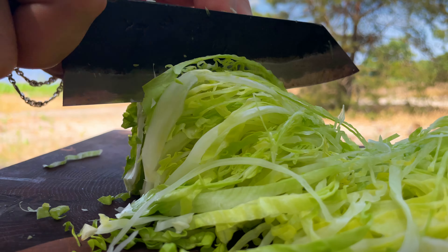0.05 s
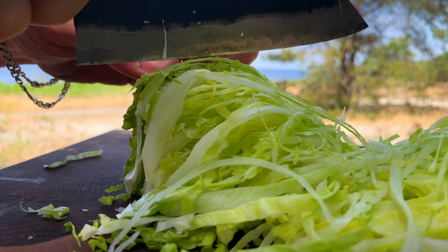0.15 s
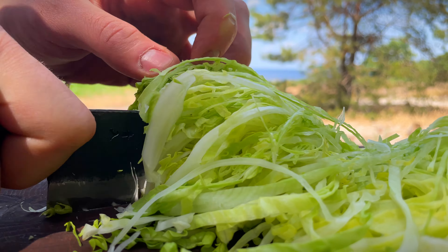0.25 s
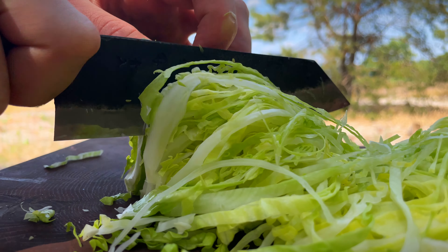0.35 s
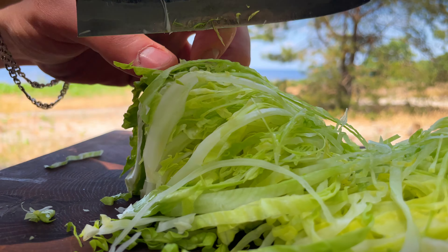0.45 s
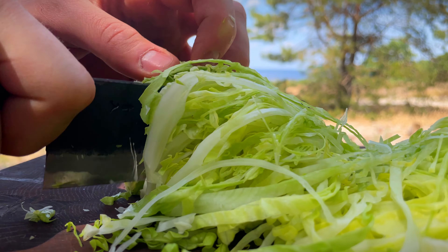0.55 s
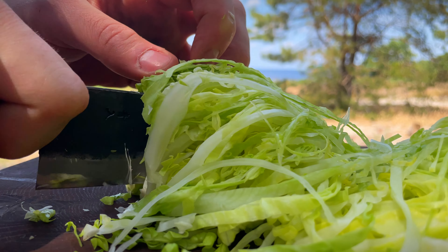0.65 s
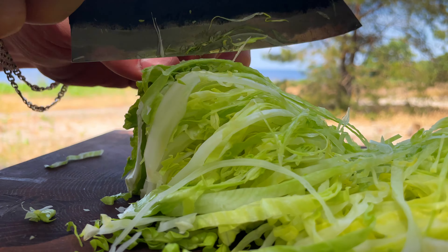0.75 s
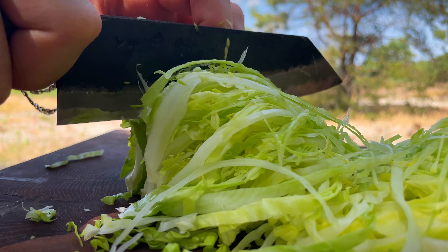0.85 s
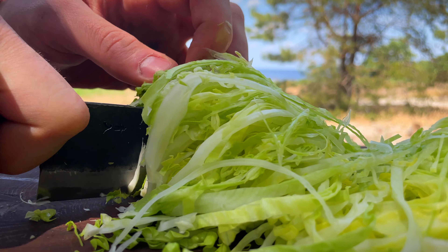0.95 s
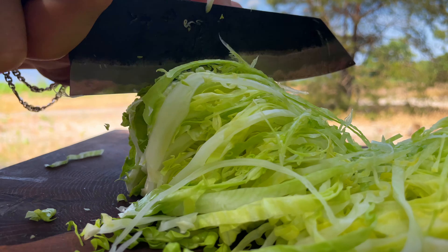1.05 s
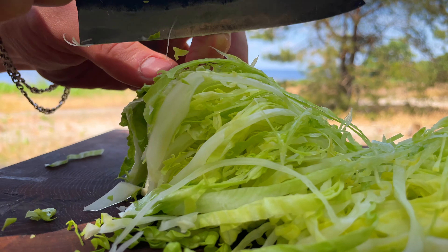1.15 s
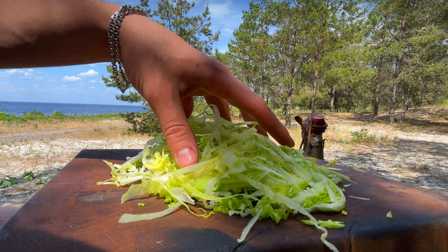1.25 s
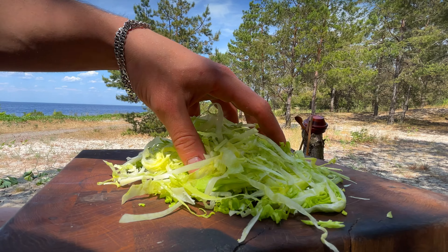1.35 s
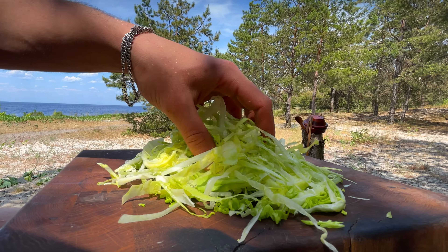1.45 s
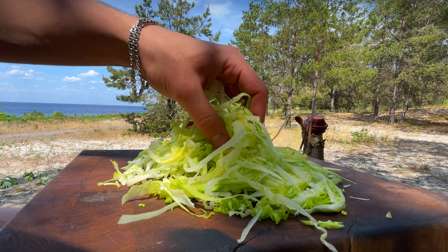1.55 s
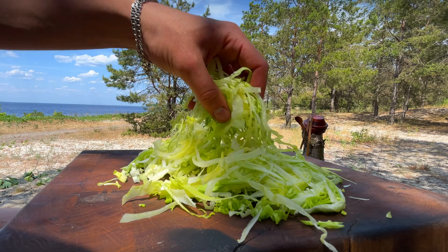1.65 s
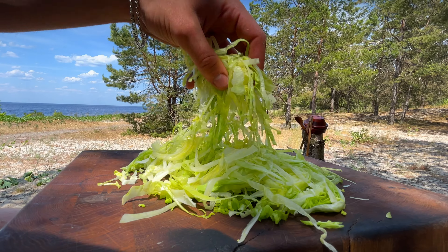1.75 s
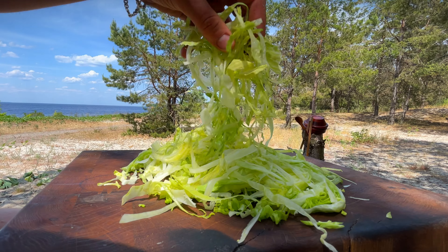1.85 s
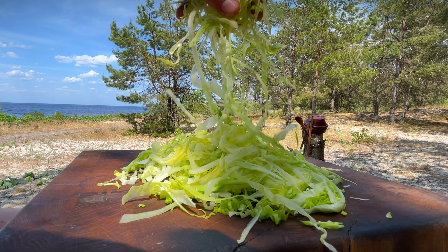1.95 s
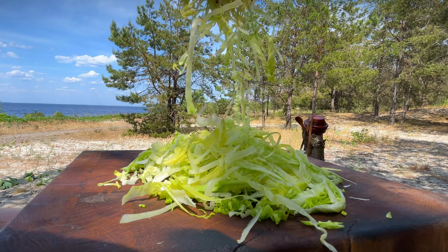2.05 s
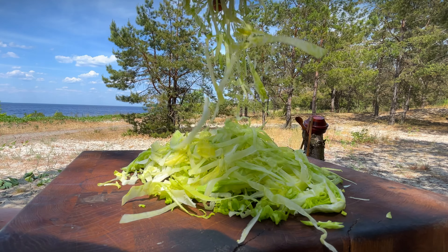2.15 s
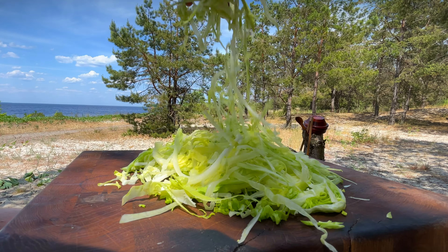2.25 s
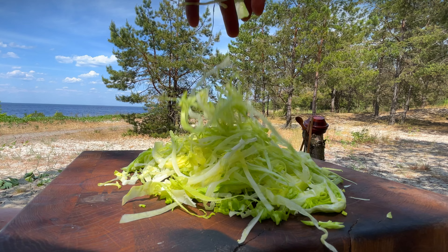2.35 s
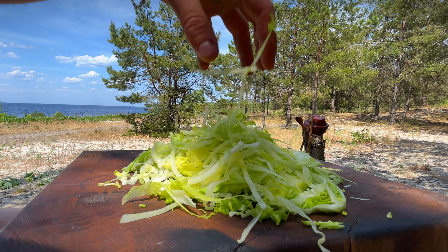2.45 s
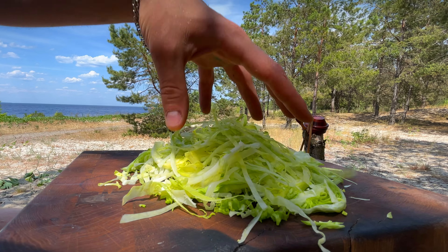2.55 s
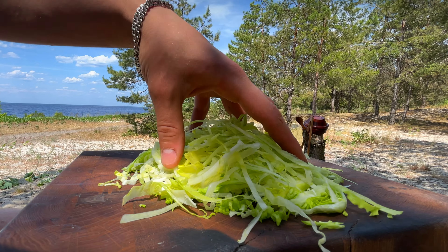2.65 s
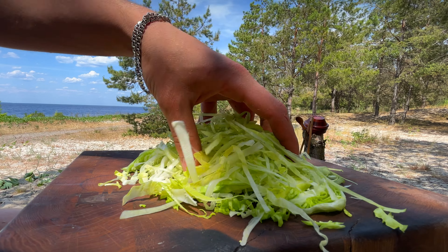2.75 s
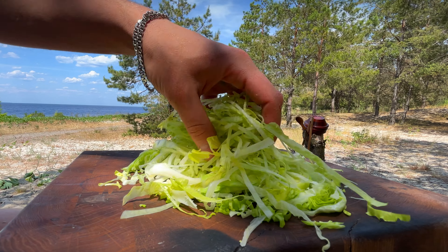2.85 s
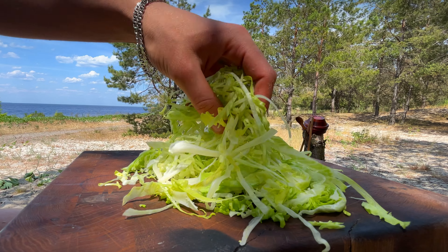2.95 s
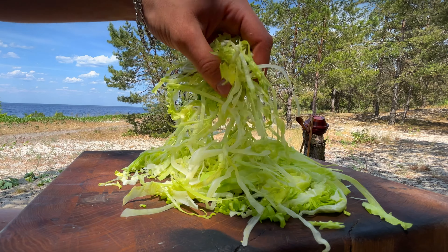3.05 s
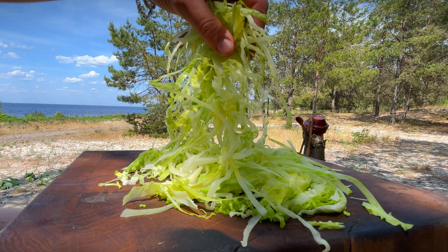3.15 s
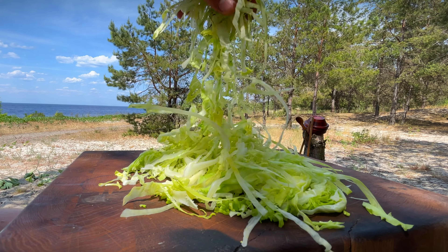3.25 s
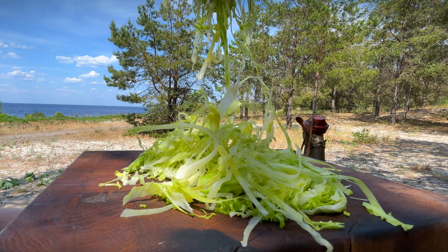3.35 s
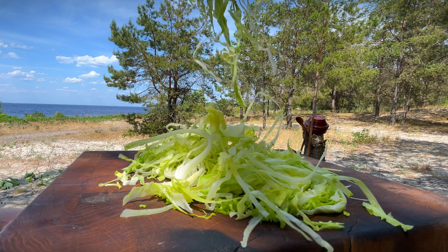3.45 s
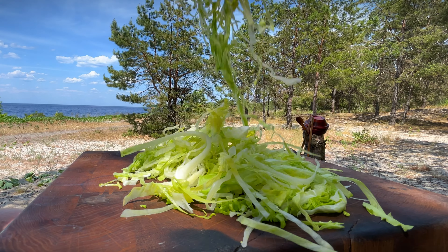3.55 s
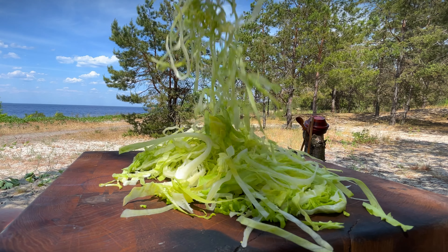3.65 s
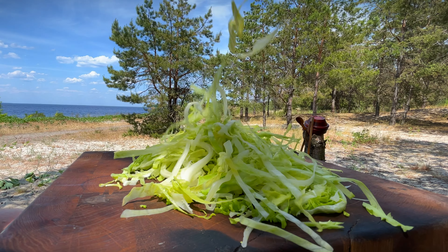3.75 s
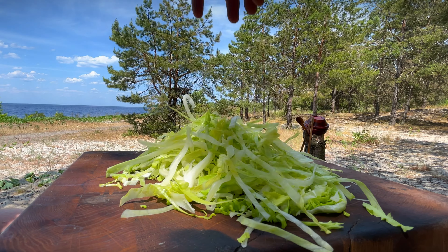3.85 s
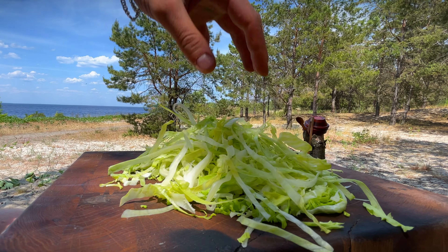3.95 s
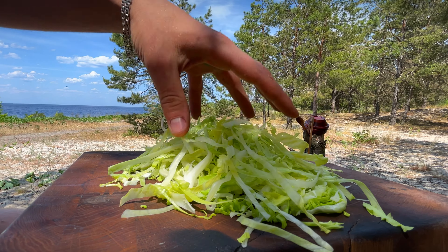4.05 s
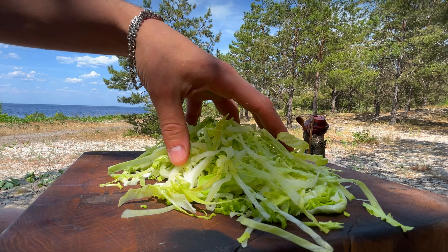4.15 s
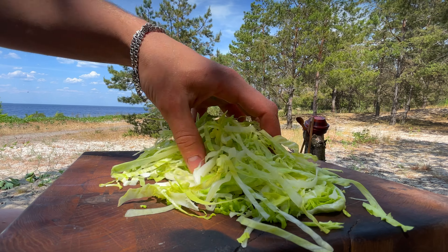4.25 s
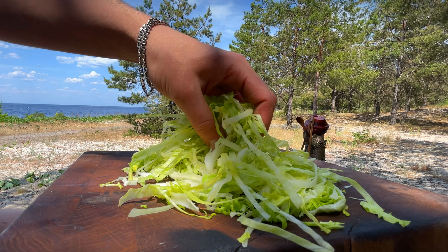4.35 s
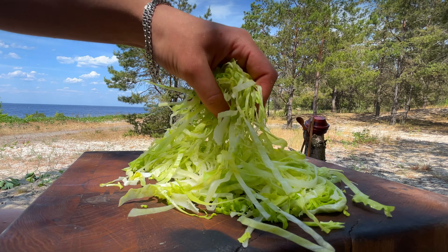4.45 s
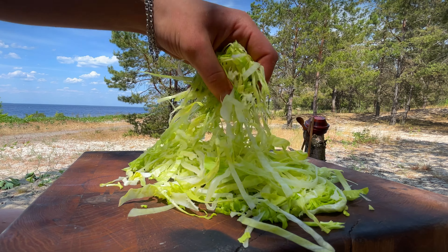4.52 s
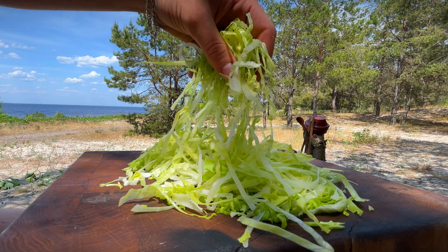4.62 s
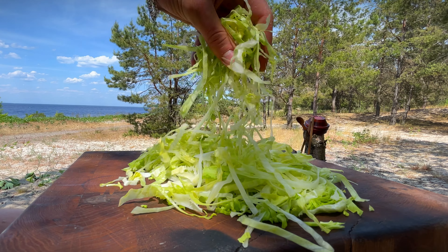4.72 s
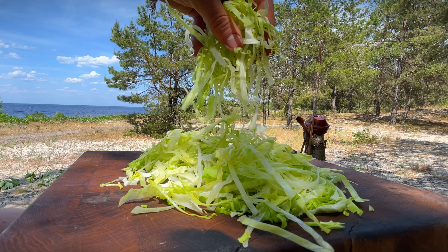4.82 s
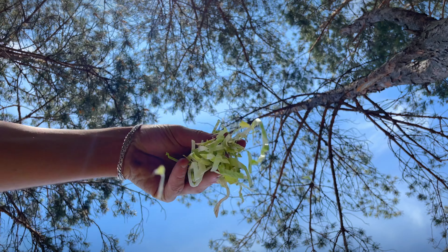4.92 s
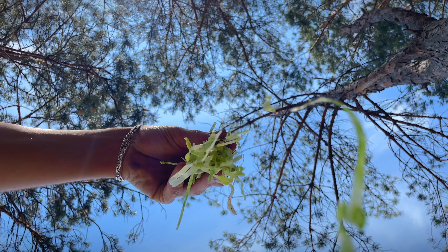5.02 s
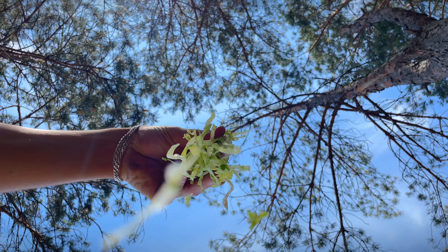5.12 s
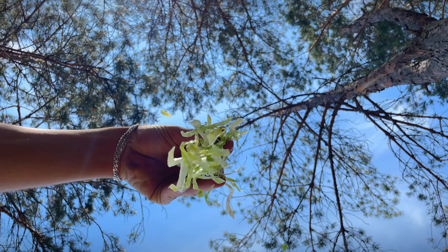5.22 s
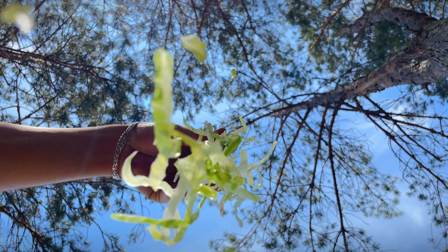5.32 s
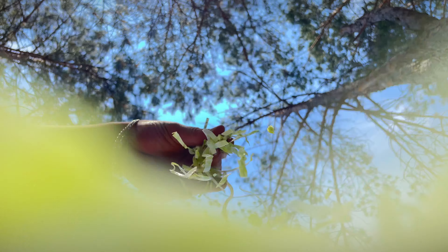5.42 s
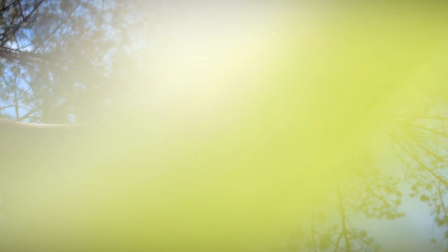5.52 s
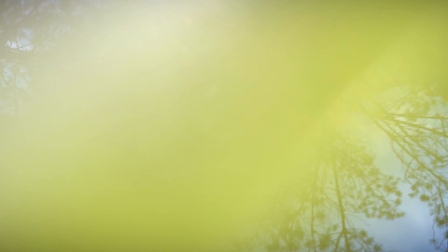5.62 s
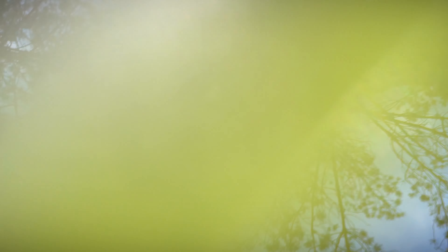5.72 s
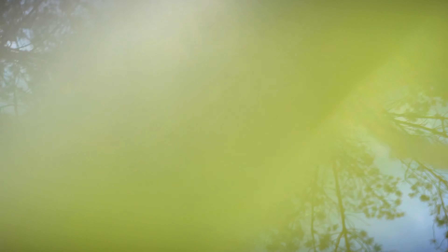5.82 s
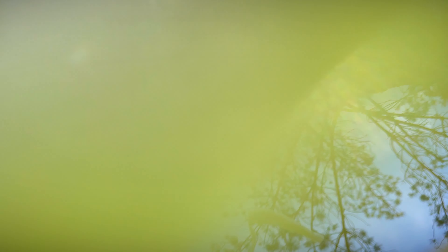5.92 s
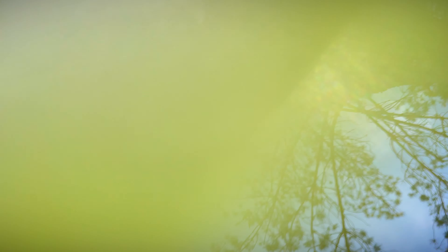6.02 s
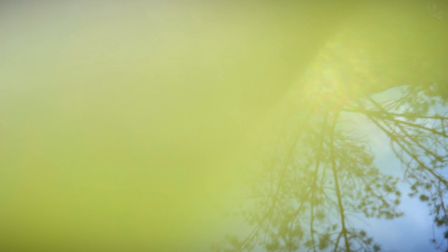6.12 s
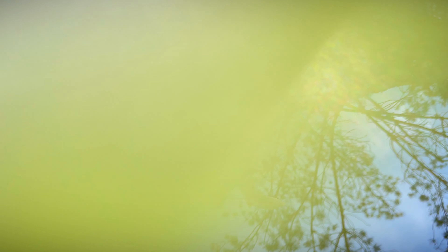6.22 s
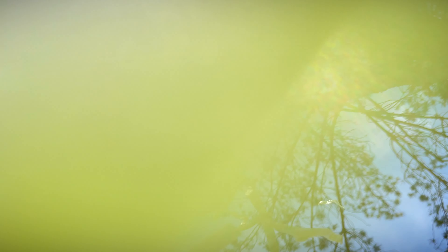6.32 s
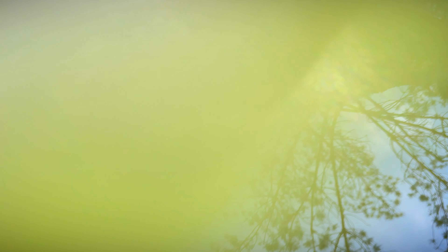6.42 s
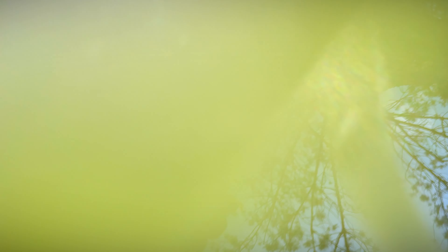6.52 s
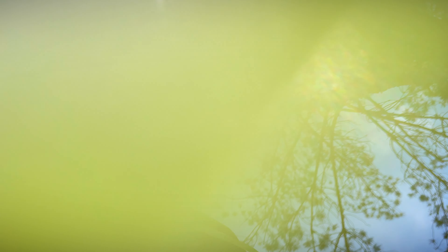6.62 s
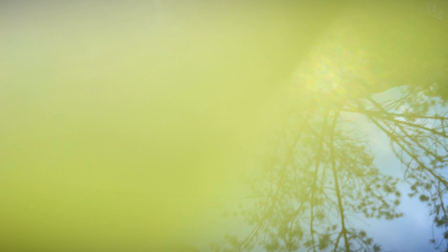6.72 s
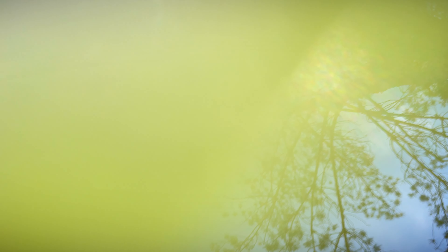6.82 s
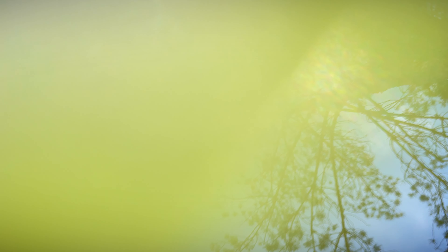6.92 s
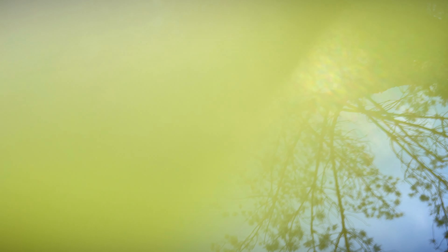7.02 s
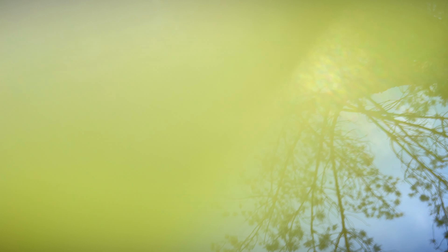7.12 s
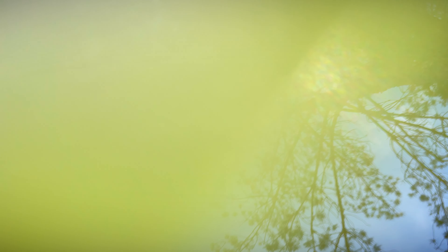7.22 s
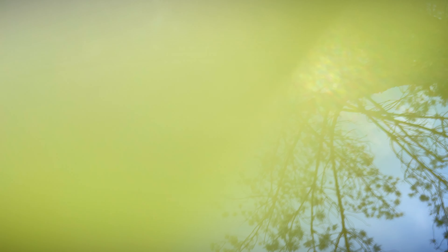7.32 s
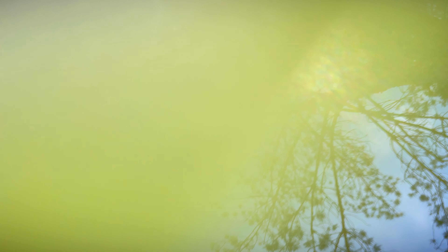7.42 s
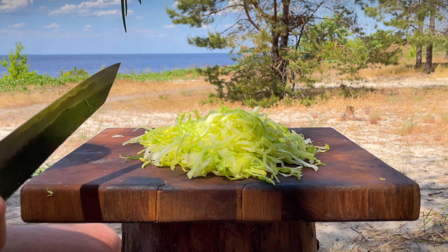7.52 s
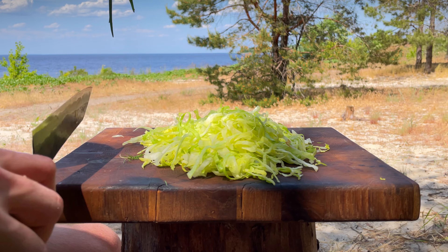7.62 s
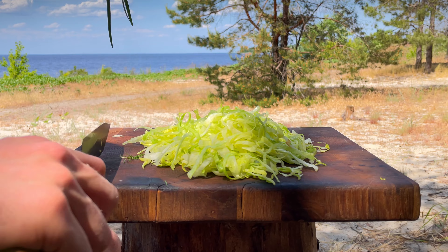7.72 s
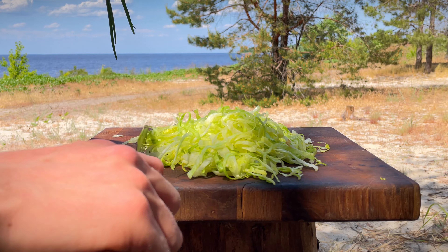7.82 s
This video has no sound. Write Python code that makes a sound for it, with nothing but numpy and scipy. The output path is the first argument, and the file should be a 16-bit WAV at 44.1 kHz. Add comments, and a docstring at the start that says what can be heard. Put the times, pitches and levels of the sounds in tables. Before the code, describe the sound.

Very close outdoors, a knife crunches through cabbage four times, each stroke ending in a solid wooden knock, with low wind buffeting. Then it turns quiet: a distant bird repeats chirps while handfuls of shreds rustle and crack lightly. Shreds patter and clumps thump wetly right onto the microphone, settling with small crinkles. Last, a knife claps onto the board and scrapes.

```python
"""Quick knife strokes crunch through a cabbage outdoors, each ending in a knock on a thick wooden board.
A bird then sings far off while handfuls of shreds are lifted and dropped; shreds rain onto the microphone.
Last, the knife is laid on the board and its blade scrapes. Low buffeting comes mainly with the knife work.
Crunch, rustle and rubbing are filtered random clicks; wood and steel are resonators struck by clicks;
bird and squeaks are sliding tones; the air is filtered noise. Table levels are relative drive levels."""
import sys
import numpy as np
from scipy import signal
from scipy.fft import rfft, irfft
from scipy.io import wavfile
from scipy.ndimage import uniform_filter1d

SR = 44100
rng = np.random.default_rng(int(sys.argv[2]) if len(sys.argv) > 2 else 0)


def log_audio(samples):
    """Write samples as a 16-bit WAV file to the path given in sys.argv[1]."""
    # one column per channel
    frames = np.atleast_2d(samples).T
    # limit to full scale, then quantise
    limited = np.clip(frames, -1, 1)
    pcm = np.round(limited * 32767).astype(np.int16)
    wavfile.write(sys.argv[1], SR, pcm)


N = 347067
TIME = np.arange(N) / SR


def from_db(db):
    """Amplitude ratio of a level in dB."""
    return 10 ** (np.asarray(db) / 20)


def rms_one(x):
    """Scale to unit rms."""
    return x / np.sqrt(np.mean(x ** 2) + 1e-20)


def level(rows):
    """Gain along a (t/s, level/dB) curve, smoothed over 180 samples; silent outside."""
    s, db = np.transpose(rows)
    curve_db = np.interp(TIME, s, db, left=-200, right=-200)
    return uniform_filter1d(from_db(curve_db), size=180)


def swells(rows, fade=0.0021):
    """Gain of (start t/s, end t/s, start level/dB, end level/dB) ramps with soft ends."""
    gain = 0
    for start, end, start_db, end_db in rows:
        gain = gain + level([(start - fade, start_db - 22.0), (start, start_db),
                             (end, end_db), (end + fade, end_db - 18.5)])
    return gain


def humps(rows):
    """Gain of rounded swells (centre t/s, length/s, level/dB), 12 dB down at both ends."""
    gain = 0
    for s, length, db in rows:
        fall_db = np.minimum(48 * ((TIME - s) / length) ** 2, 200)
        gain = gain + from_db(db - fall_db)
    return gain


def drift(rate_hz):
    """Slow random wander of unit rms: twice-smoothed noise, one value per 40 samples."""
    r = np.exp(-80 * np.pi * rate_hz / SR)
    noise = rng.standard_normal(N // 40 + 2002)
    slow = signal.lfilter([1], [1, -2 * r, r * r], noise)[2000:]  # skip the run-in
    return np.interp(np.arange(N) / 40, np.arange(len(slow)), rms_one(slow))


def colour(x, spectrum, size=4096):
    """Minimum-phase filter of unit energy; 18 dB/octave fall outside the f/Hz, level/dB table."""
    hz, db = np.transpose(spectrum)
    octave = np.log2(np.maximum(np.arange(size // 2 + 1), .5) * SR / size)
    beyond = np.abs(octave - np.clip(octave, np.log2(hz[0]), np.log2(hz[-1])))
    target_db = np.interp(octave, np.log2(hz), db) - 18 * beyond
    # folding the cepstrum makes the response causal
    cepstrum = irfft(np.log(from_db(target_db)))
    response = irfft(np.exp(rfft(2 * cepstrum[:size // 2], size) - cepstrum[0]))
    return signal.oaconvolve(x, response / np.linalg.norm(response))[:N]


def band(x, low_hz, high_hz):
    """Butterworth bandpass."""
    edges_hz = [low_hz, min(high_hz, SR / 2 - 1)]
    return signal.sosfilt(signal.butter(2, edges_hz, "band", fs=SR, output="sos"), x + 1e-18)


def grains(per_s, spread_db):
    """Single-sample clicks at random moments, a few much larger than the rest; unit rms."""
    sizes = from_db(spread_db * np.minimum(rng.exponential(1, N), 4)) * rng.choice([-1, 1], N)
    return rms_one(sizes * (rng.random(N) < per_s / SR))


def crackle(per_s, spread_db, cluster_db, cluster_rate_hz, patchy_db, count=7):
    """Grains in clusters of varying colour: each band drifts by itself; unit rms."""
    edges_hz = np.geomspace(700, 17000, count)
    source = grains(per_s, spread_db)
    out = np.zeros(N)
    for k, (low, high) in enumerate(zip([20, *edges_hz], edges_hz)):
        out += (-1) ** k * band(source, low, high) * from_db(patchy_db * drift(cluster_rate_hz))
    return rms_one(out * from_db(cluster_db * drift(cluster_rate_hz)))


def add(out, s, sound):
    """Mix a sound into out at s seconds."""
    at = max(round(s * SR), 0)
    out[at:at + len(sound)] += sound[:N - at]


def contacts(rows, crumble, t60, size=2400):
    """A click per (t/s, level/dB), trailed by noise decaying 60 dB in t60 seconds."""
    out = np.zeros(N)
    for s, db in rows:
        touch = crumble * rng.standard_normal(size) * from_db(-60 * TIME[:size] / t60)
        touch[0] = 1
        add(out, s, from_db(db) * touch)
    return out


def ring(force, modes):
    """Damped resonators (f/Hz, level/dB, t60/s) driven in parallel, with alternating signs."""
    out = np.zeros(N)
    for k, (hz, db, t60) in enumerate(modes):
        r, w = from_db(-60 / (t60 * SR)), 2 * np.pi * hz / SR
        mode = signal.lfilter([0, np.sin(w)], [1, -2 * r * np.cos(w), r * r], force + 1e-18)
        out += (-1) ** k * from_db(db) * mode
    return out


def glides(rows, hoarse):
    """Sliding tones (start t/s, length/s, start f/Hz, end f/Hz, level/dB); phase noise adds hoarseness."""
    out = np.zeros(N)
    for s, length, start_hz, end_hz, db in rows:
        along = np.linspace(0, 1, int(length * SR))
        steps = 2 * np.pi * (start_hz + (end_hz - start_hz) * along) / SR
        phase = np.cumsum(steps + hoarse * rng.standard_normal(len(along)))
        envelope = np.sqrt(np.abs(np.sin(np.pi * along)))
        add(out, s, from_db(db) * envelope * np.sin(phase))
    return out


# spectra of outdoor noise, breeze and buffeting: f/Hz, level/dB
AIR_COLOUR = [(30, -23.5), (60, -12.5), (250, -3.5), (400, -9.5), (650, -15.5), (1130, -16), (1860, -20.5),
              (3140, -21), (5000, -27), (10500, -36.5), (16000, -46.5)]
BREEZE_COLOUR = [(30, -26.5), (60, -2), (180, -2), (290, -4.5), (420, -15.5), (700, -28.5)]
BUFFET_COLOUR = [(25, -19), (56, -5), (91, 1.5), (193, -3.5), (405, -18.5), (700, -35)]
# outdoor noise; light breeze; low buffeting: start t/s, end t/s, start level/dB, end level/dB
WASH = [(0, 4.96, -61, -61), (4.962, 7.88, -63, -63)]
BREEZES = [(1.25, 4.1, -60, -60.5), (4.102, 4.97, -65, -64.5), (6.7, 7.51, -66, -68)]
BUFFETING = [(0, 1.245, -40, -34.5), (7.515, 7.88, -49, -45.5)]
# gusts: centre t/s, length/s, level/dB
GUSTS = [(0.058, 0.027, -28), (0.168, 0.031, -35), (0.605, 0.12, -32), (3.02, .25, -60.5),
         (3.3, .14, -60.5), (3.9, .25, -66), (7.65, 0.075, -31.5), (7.855, 0.047, -29)]
# the background level dips briefly: centre t/s, length/s, depth/dB
DIPS = [(5.007, .1, 0.5), (5.167, .12, 2.5), (5.616, 0.26, 11)]


def outdoors():
    """Even outdoor noise that dips briefly; wind on the microphone as low noise with lumpy level."""
    depth_db = sum(depth * humps([(s, length, 0)]) for s, length, depth in DIPS)
    air = colour(rng.standard_normal(N), AIR_COLOUR) * swells(WASH) * from_db(-depth_db)
    lumps = rms_one(rng.standard_normal(N) * from_db(4.4 * drift(rate_hz=110)))
    breeze = colour(lumps * swells(BREEZES), BREEZE_COLOUR)
    buffeting = colour(lumps * (swells(BUFFETING) + humps(GUSTS)), BUFFET_COLOUR)
    highpass = signal.butter(2, 38, "high", fs=SR, output="sos")
    return signal.sosfilt(highpass, air + breeze + buffeting)


# bird phrase: evenly repeated down-slurs, those of the second half led in by an up-sweep
PHRASE_START_S, SYLLABLE_S = 1.235, .161
SLUR_S, SLUR_TOP_HZ, SLUR_END_HZ, SLUR_DB = .04, 3900, 2717, -65.5
SWEEP_LEAD_S, SWEEP_S, SWEEP_START_HZ, SWEEP_TOP_HZ, SWEEP_DB = .027, .043, 2920, 5080, -70.5
# slow whistles: start t/s, length/s, start f/Hz, end f/Hz, level/dB
WHISTLES = [(6.209, 0.12, 2850, 4050, -74), (6.642, 0.059, 3030, 3240, -70), (6.97, 0.1, 3190, 2600, -69.5)]


def bird(size=22000):
    """Hoarse glides and slow whistles, smeared by scattering among trees: a decaying noise tail."""
    starts = PHRASE_START_S + SYLLABLE_S * np.arange(8)
    slurs = [(s, SLUR_S, SLUR_TOP_HZ, SLUR_END_HZ, SLUR_DB) for s in starts]
    sweeps = [(s - SWEEP_LEAD_S, SWEEP_S, SWEEP_START_HZ, SWEEP_TOP_HZ, SWEEP_DB)
              for s in starts[len(starts) // 2:]]
    song = glides(slurs + sweeps, hoarse=0.11) + glides(WHISTLES, hoarse=.19)
    trees = rng.standard_normal(size) * from_db(-60 * TIME[:size] / .6)  # t60 0.6 s
    scattered = signal.oaconvolve(song, trees / np.linalg.norm(trees))[:N]
    return from_db(8) * song + from_db(5.0) * scattered


# rustle spectrum: f/Hz, level/dB
RUSTLE_COLOUR = [(300, -26.5), (700, 0), (2000, 10), (4000, 5.5), (8000, -7.5), (13000, 3.5), (16000, -32)]
# handfuls sliding through the fingers; a handful pattering back: centre t/s, length/s, level/dB
HANDFULS = [(1.68, 0.83, -64), (2.31, 0.38, -65), (2.78, 0.64, -68), (3.28, 0.39, -62.5),
            (3.85, 0.65, -67.5), (4.65, .7, -77.5)]
PATTERS = [(3.63, 0.28, -60.5)]
# single shreds cracking: t/s, level/dB, f/Hz
CRACKS = [(1.516, -23, 2400), (1.6368, -33.5, 2560), (2.1123, -22.5, 4700), (2.7511, -28.5, 8700),
          (3.266, -31, 2500), (3.3496, -40.5, 5150), (3.411, -30.5, 12000), (3.524, -41, 6800),
          (3.905, -43, 5000), (4.125, -26.5, 5500), (4.6467, -31, 2880)]
# the thinner the shred, the higher its crack and the weaker its soft body
THICK_SHRED_HZ, BODY_DB, BODY_LOSS_DB_PER_OCTAVE = 2500, 11, 8.5


def tossing():
    """Loose shreds rustle as clustered clicks and patter; single ones crack over a soft low body."""
    friction = crackle(per_s=1800, spread_db=3.0, cluster_db=-0.5, cluster_rate_hz=74, patchy_db=3.8)
    rustle = colour(friction * humps(HANDFULS), RUSTLE_COLOUR)
    patter = rms_one(band(grains(per_s=500, spread_db=3), 580, 1050)) * humps(PATTERS)
    cracks = np.zeros(N)
    bodies = []
    for s, db, hz in CRACKS:
        cracks += band(contacts([(s, db)], crumble=0.34, t60=0.012), hz / 2, hz * 2)
        octaves_thinner = np.log2(hz / THICK_SHRED_HZ)
        bodies.append((s, db + BODY_DB - BODY_LOSS_DB_PER_OCTAVE * octaves_thinner))
    body = band(contacts(bodies, crumble=0.54, t60=0.022), 170, 830)
    return rustle + patter + from_db(6) * cracks + body


# clumps landing on the microphone: t/s, pat level/dB, wet tick level/dB, thud level/dB,
# crinkle level/dB, folding/s, settling/s
CLUMPS = [(5.269, -8.5, 3.5, -17, -39, 0.016, 0.017), (5.4642, -11.5, 3.5, -9.5, -16, .026, .032),
          (5.519, -52, -51, -39, -62, .005, .015), (5.739, -45, -24.5, -36, -53, .005, .015),
          (5.875, -27.5, -13.5, -33.5, -37, 0.0063, 0.055), (5.991, -32, -11.5, -24.5, -29, 0.016, 0.059),
          (6.374, -40, -26, -27, -29, 0.0099, 0.041), (6.395, -22.5, -28, -22.5, -36.5, 0.0092, 0.029),
          (6.437, -32, -18, -38, -33.5, 0.018, 0.035), (6.462, -30, -14, -28, -33.5, 0.019, .045),
          (6.575, -35.5, -35, -28, -39, 0.027, 0.048), (6.951, -22, -21.5, -29, -47, 0.0057, 0.033)]
# crinkle rises through the fold, eases at once on landing, then settles
FOLD_RISE_DB, EASE_S, EASE_DB, LOUDEST_SETTLING_DB, SETTLED_DB = 21, 0.0071, 5.5, -35, -66


def slumping():
    """Gain of the clumps' movement: each folds down, lands and settles."""
    gain = 0
    for s, *_, db, fold, settle in CLUMPS:
        eased_db = min(db - EASE_DB, LOUDEST_SETTLING_DB)
        gain = gain + level([(s - fold, db - FOLD_RISE_DB), (s, db),
                             (s + EASE_S, eased_db), (s + settle, SETTLED_DB)])
    return gain


def bright_ticks(follows=.78):
    """Fine bright ticks accompany the crinkling; level follows a power < 1 of the capped slumping gain."""
    sliding = np.clip(slumping(), 0, from_db(-23.5)) ** follows
    ticks = rms_one(band(grains(per_s=870, spread_db=6.5), 4000, 16000))
    return from_db(-23.5) * ticks * sliding


def microphone_rumble(lag_s=0.018, linger=1.6, fall_db=10, most_db=-39):
    """Settling weight rocks the microphone just after each touch: low-band thumps and noise."""
    touches = [(s + lag_s, thud_db) for s, _, _, thud_db, *_ in CLUMPS]
    rocking = from_db(-3.5) * contacts(touches, crumble=0.26, t60=0.19, size=8000)
    loads = []
    for s, *_, crinkle_db, _, settle in CLUMPS:
        start, db = s + lag_s, min(crinkle_db - 8.5, most_db)
        loads.append((start, start + linger * settle, db, db - fall_db))
    weight = rms_one(band(rng.standard_normal(N), 46, 201)) * swells(loads, fade=.008)
    return band(band(rocking, 45, 190) + weight, 25, 260)


def pat(hz, width, size=4000):
    """A soft, heavily damped blow of peak 1; the lower it is, the later it peaks."""
    wave = band(signal.unit_impulse(size), hz / (1 + width), hz * (1 + width))
    return wave / np.abs(wave).max()


def lows_late(x, lowest_hz=85, sharpness=.72, count=4):
    """Allpasses an octave apart: the microphone's low-cut filtering delays lows, so thumps sweep downward."""
    for hz in lowest_hz * 2 ** np.arange(count):
        w = 2 * np.pi * hz / SR
        damping = np.sin(w) / (2 * sharpness)
        poles = [1 + damping, -2 * np.cos(w), 1 - damping]
        x = signal.lfilter(poles[::-1], poles, x + 1e-18)
    return x


# light shreds landing beside the microphone: t/s, pat level/dB, wet tick level/dB
SHREDS = [(4.955, -7.5, -13), (4.960, -21, -15.5), (5.063, -27, -31), (5.105, -20.5, -21),
          (5.129, -34, -27.5), (5.197, -32.5, -28.5), (5.235, -25, -32.5), (6.327, -48, -32)]
# crumbs sprinkling around the microphone: centre t/s, length/s, level/dB
SPRINKLES = [(5.14, 0.019, -47), (5.33, 0.13, -63), (5.617, 0.032, -58.5), (5.95, 0.058, -58.5),
             (6.8, 0.093, -62.5)]
# spectra of wet ticks and crinkling clumps: f/Hz, level/dB
TICK_COLOUR = [(400, -35), (1500, -0.5), (3800, -2.5), (7000, -9.5), (13000, -19.5), (16000, -29)]
SLUMP_COLOUR = [(100, -22), (420, 10), (1000, -3), (2400, -8.5), (5000, -17), (10000, -24), (16000, -39)]
# the heavier the piece, the lower its pat: pitches at the typical level
TYPICAL_PAT_DB, SHRED_PAT_HZ, CLUMP_PAT_HZ, PAT_FALL_OCTAVES_PER_DB = -26, 1600, 880, .038


def falling_shreds():
    """Each piece gives a wet tick and a pat; clumps also thud on the microphone and crinkle."""
    landings = [row[:3] for row in SHREDS + CLUMPS]
    ticks = [(s, tick_db) for s, _, tick_db in landings]
    hits = colour(contacts(ticks, crumble=0.27, t60=0.006), TICK_COLOUR)
    for pieces, typical_hz, width in ((SHREDS, SHRED_PAT_HZ, .35), (CLUMPS, CLUMP_PAT_HZ, .55)):
        for s, pat_db, *_ in pieces:
            hz = typical_hz * 2 ** (PAT_FALL_OCTAVES_PER_DB * (TYPICAL_PAT_DB - pat_db))
            add(hits, s + .0004, from_db(pat_db) * pat(hz, width))
    for s, _, _, thud_db, *_ in CLUMPS:
        add(hits, s + 0.0008, from_db(thud_db + 2.0) * pat(hz=150, width=1.27))
    # a limp shred brushes first, then flops down after its tip, among smaller crumbs
    flops = [(s + .001, pat_db) for s, pat_db, _ in landings]
    flop = from_db(2.5) * contacts(flops, crumble=0.43, t60=0.028)
    brushing = sum(level([(s - .014, min(pat_db - 32, -50)), (s, min(pat_db - 14, -32))])
                   for s, pat_db, _ in landings)
    brush = brushing * rng.standard_normal(N)
    crumbs = grains(per_s=700, spread_db=5) * humps(SPRINKLES)
    lowpass = signal.butter(8, 2700, fs=SR, output="sos")
    dull = signal.sosfilt(lowpass, band(flop + brush + from_db(6) * crumbs, 480, 3400))
    crumb_ticks = from_db(-3) * colour(crumbs, TICK_COLOUR)
    bursts = crackle(per_s=3000, spread_db=3.8, cluster_db=5.0, cluster_rate_hz=310, patchy_db=1.0)
    crinkle = colour(bursts * slumping(), SLUMP_COLOUR)
    return lows_late(hits + dull + crumb_ticks + crinkle)


# knife swung in over the board: centre t/s, length/s, level/dB
SWING = [(7.6, .12, -59)]
# knife laid flat on the board: t/s, level/dB
SET_DOWN = [(7.7320, -24.5), (7.7338, -8.5), (7.7358, -31)]
# blade sliding over the wood: t/s, level/dB
SCRAPE = [(7.735, -64), (7.745, -34.5), (7.79, -40), (7.83, -34), (7.87, -40.5)]
# modes of the knife lying on the wood: f/Hz, level/dB, t60/s
KNIFE = [(586, -4, 0.013), (1050, -2.5, 0.0078), (1386, -2.5, 0.023), (1860, -4.5, 0.018),
         (2420, -10, 0.02), (2665, -14, 0.043), (3260, -11.5, 0.023), (3994, -8.5, 0.027),
         (5670, -22.5, 0.033), (6760, -32, 0.079), (8800, -36, 0.059), (9840, -29.5, 0.1),
         (11300, -27, 0.066), (13200, -36, .06)]


def knife_laid_down():
    """The blade swishes in and claps onto the board, then friction keeps the same modes singing."""
    swish = band(rng.standard_normal(N), 2000, 12000) * humps(SWING)
    clap = ring(band(contacts(SET_DOWN, crumble=0.074, t60=0.026), 620, 3080), KNIFE)
    friction = grains(per_s=6000, spread_db=3)
    scrape = rms_one(ring(friction, KNIFE)) + from_db(-14.5) * band(friction, 370, 10700)
    return from_db(5.0) * clap + scrape * level(SCRAPE) + swish


# knife strokes, timed by the knock: t/s, knock level/dB, time in the leaves/s,
# crunch level at entry/dB, drag on the way up after/s, drag level/dB
STROKES = [(0.0003, -5.5, .06, -35, 0.11, -43), (0.3219, -8.5, 0.06, -50, 0.14, -39.5),
           (0.6540, -8, 0.059, -38, 0.18, -42.5), (0.9900, -6.5, 0.074, -31.5, 0.12, -44)]
# board modes under the edge: f/Hz, level/dB
BOARD = [(695, -5.5), (1030, -12.5), (1215, -1.5), (1370, -4), (1793, -7), (2497, -2), (3130, -9.5),
         (3900, -17.5)]


def board():
    """The edge breaks through and knocks on the wood; torn fibres fizz briefly after it."""
    chops = [row[:2] for row in STROKES]
    # wood damps its high modes soonest
    modes = [(hz, db, .033 * (700 / hz) ** .3) for hz, db in BOARD]
    knock = ring(band(contacts(chops, crumble=0.13, t60=0.013), 220, 6000), modes)
    crack = band(contacts(chops, crumble=.22, t60=.04), 600, 3200)
    fibres = band(contacts(chops, crumble=.3, t60=.06), 2500, 14000)
    return from_db(-1.0) * knock + from_db(-3.5) * crack + from_db(-24.5) * fibres


# thick ribs snapping: t/s, level/dB
SNAPS = [(0.070, -28), (0.283, -19), (0.343, -18), (0.641, -1), (0.9625, -3.5), (0.980, -3)]
# wet leaf squeaking on the steel: start t/s, length/s, start f/Hz, end f/Hz, level/dB
SQUEAKS = [(0.104, 0.0302, 984, 1630, -39), (0.452, 0.0205, 1136, 1870, -30.5)]
# spectra of crunch and rubbing: f/Hz, level/dB
CRUNCH_COLOUR = [(550, -20), (950, -8), (1800, 0.5), (2300, -7.5), (3400, -3), (6120, -13), (9900, -17),
                 (14000, -20), (16000, -33)]
RUB_COLOUR = [(700, -15), (1300, -4.5), (3280, -12), (9000, -24), (16000, -31)]
# modes of the free blade: f/Hz, level/dB, t60/s
BLADE = [(6480, -2, .12), (7320, -3.5, .12), (8180, 0, .16), (9050, -2, .12)]
# every cut bursts the outer leaf, then swells to the same level at the board
OUTER_LEAF_S, OUTER_LEAF_DB, CUT_END_DB = .02, -35, -23
# after the knock the blade is drawn up the cut face, drags once and rings as it comes free
LIFT_AFTER_S, FREE_AFTER_S, RUB_DB, DRAG_S, FREE_RING_DB = .07, 0.17, -53, 0.054, -65


def cutting():
    """Cells burst in clusters as the edge passes the leaves; then the wet face rubs the rising blade."""
    stroke, lift = 0, 0
    for s, _, length, entry_db, drag_after, drag_db in STROKES:
        entry = s - length
        stroke = stroke + swells([(entry, s, entry_db, CUT_END_DB)], fade=0.0033)
        stroke = stroke + humps([(entry + OUTER_LEAF_S / 2, OUTER_LEAF_S, OUTER_LEAF_DB)])
        lift = lift + swells([(s + LIFT_AFTER_S, s + FREE_AFTER_S, RUB_DB, RUB_DB)], fade=.025)
        lift = lift + humps([(s + drag_after, DRAG_S, drag_db)])
    bursts = crackle(per_s=4200, spread_db=3.6, cluster_db=2.7, cluster_rate_hz=190, patchy_db=3)
    snaps = from_db(2.5) * contacts(SNAPS, crumble=.2, t60=0.005)
    crunch = colour(bursts * stroke + snaps, CRUNCH_COLOUR) + from_db(-9.0) * band(snaps, 6000, 17000)
    fine_grit = grains(per_s=7000, spread_db=5.5) * from_db(2 * drift(rate_hz=97))
    grit = fine_grit + from_db(-8) * grains(per_s=110, spread_db=6.5)
    rub = from_db(-4.5) * colour(grit, RUB_COLOUR) * lift
    releases = [(s + FREE_AFTER_S, FREE_RING_DB) for s, *_ in STROKES]
    free_ring = ring(contacts(releases, crumble=.05, t60=.01), BLADE)
    return crunch + rub + free_ring + glides(SQUEAKS, hoarse=0.1)


def scene():
    """Background, shreds and knife work summed to one channel."""
    shreds = tossing() + falling_shreds() + bright_ticks() + microphone_rumble()
    knife_work = cutting() + board() + knife_laid_down()
    return (outdoors() + bird() + shreds + knife_work)[None]


CUTOFF_HZ = 16200


def record(dry):
    """Soft saturation rounds off the loudest peaks; a steep lowpass cuts the top."""
    top = .72  # saturation ceiling
    lowpass = signal.ellip(10, .1, 70, CUTOFF_HZ, fs=SR, output="sos")
    return signal.sosfilt(lowpass, top * np.tanh(dry / top))


dry = scene()
out = record(dry)
log_audio(out)
```